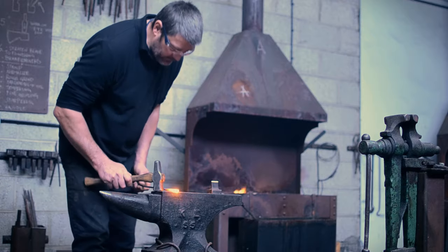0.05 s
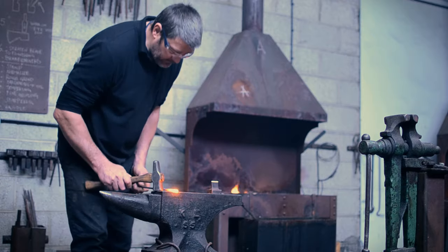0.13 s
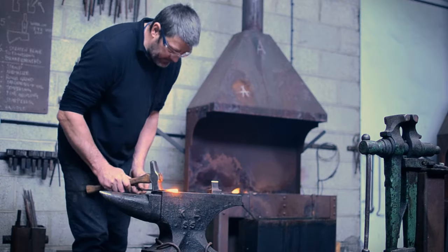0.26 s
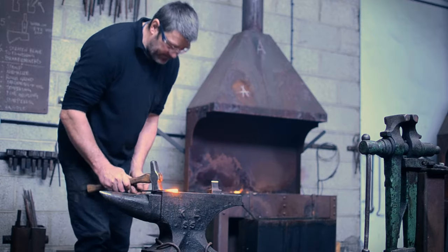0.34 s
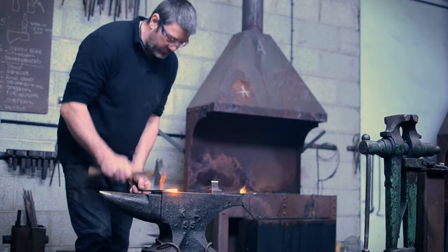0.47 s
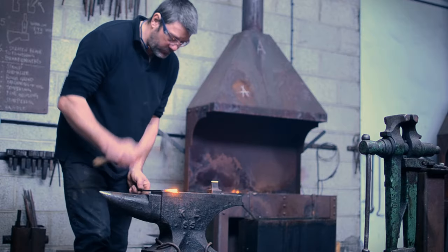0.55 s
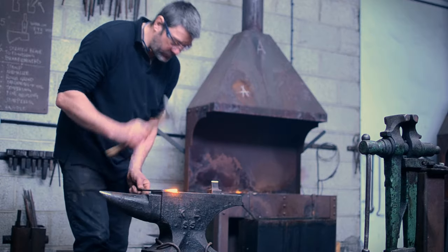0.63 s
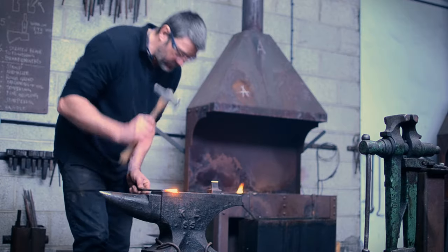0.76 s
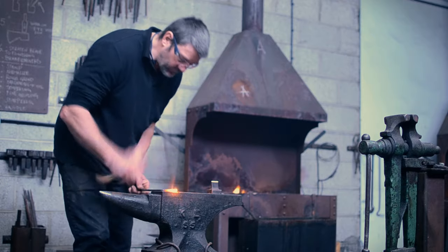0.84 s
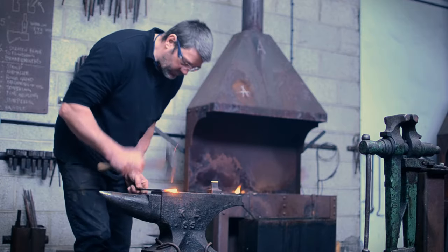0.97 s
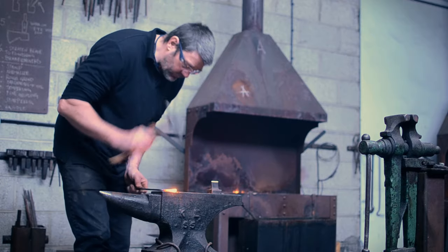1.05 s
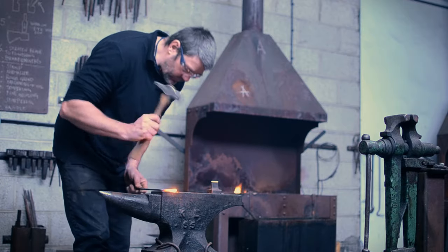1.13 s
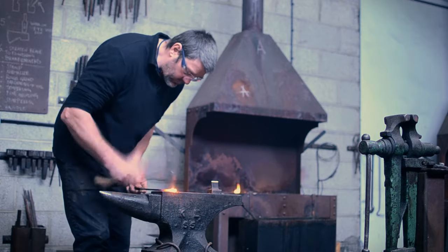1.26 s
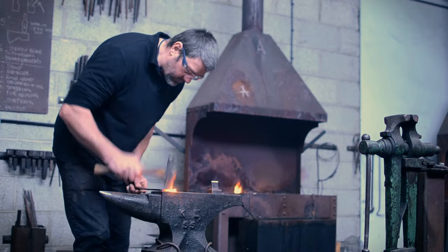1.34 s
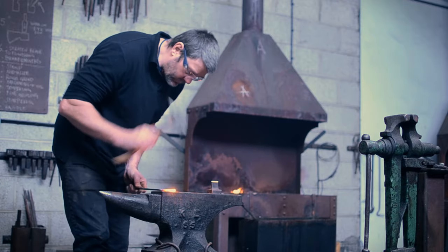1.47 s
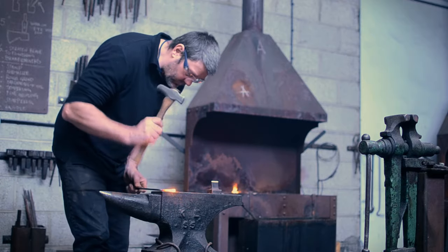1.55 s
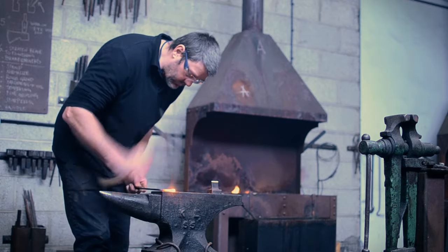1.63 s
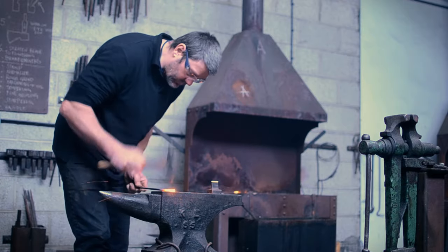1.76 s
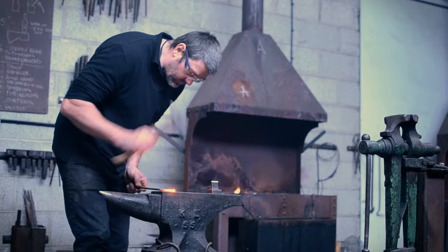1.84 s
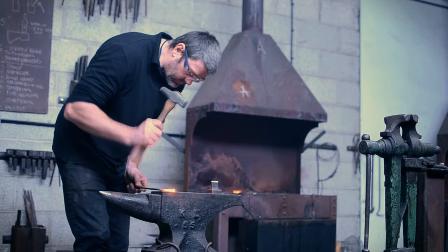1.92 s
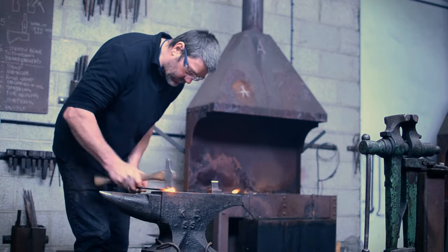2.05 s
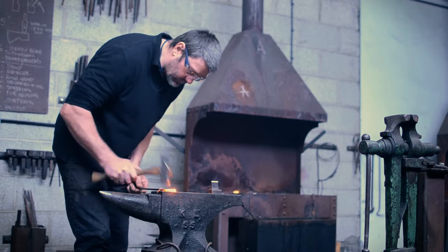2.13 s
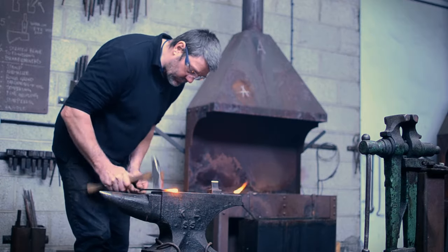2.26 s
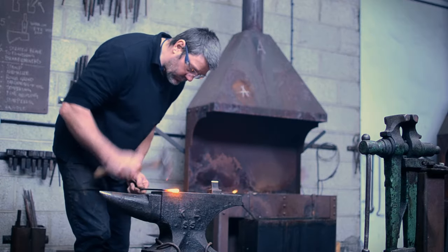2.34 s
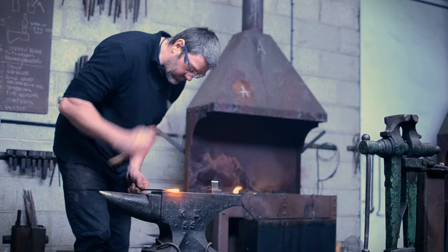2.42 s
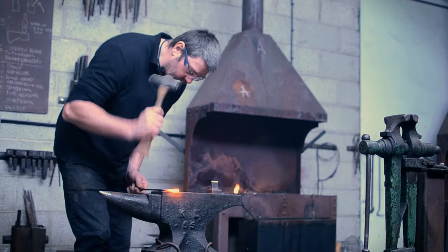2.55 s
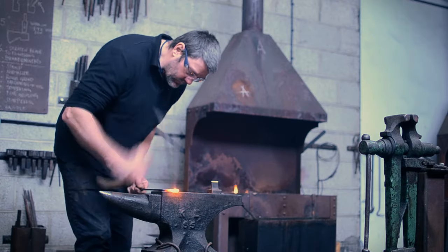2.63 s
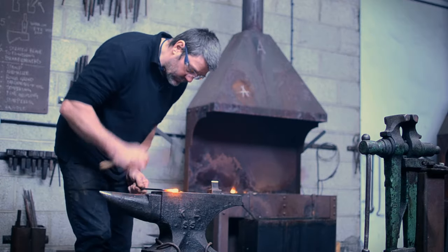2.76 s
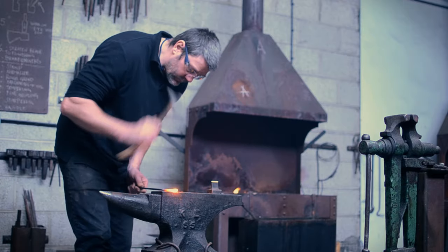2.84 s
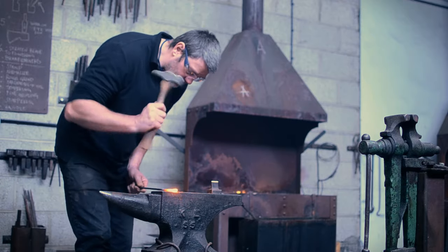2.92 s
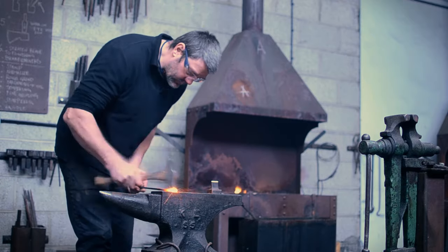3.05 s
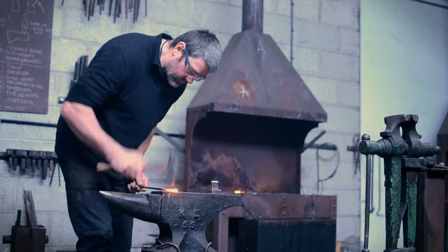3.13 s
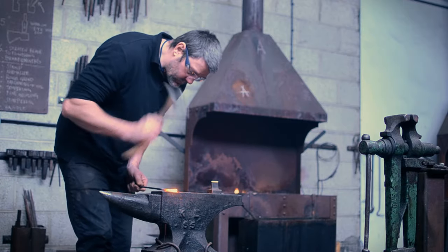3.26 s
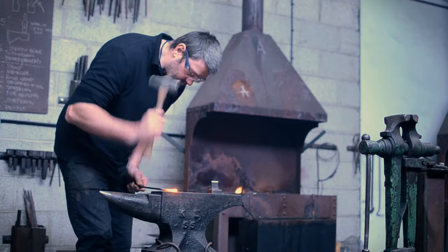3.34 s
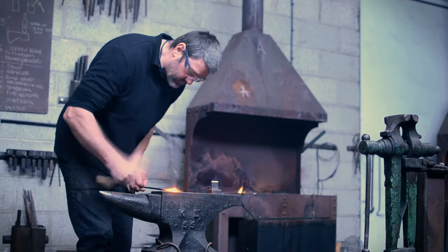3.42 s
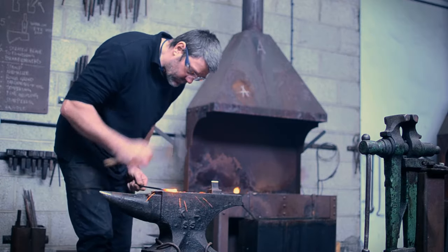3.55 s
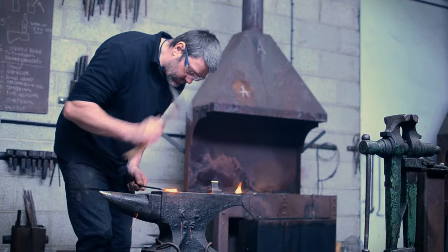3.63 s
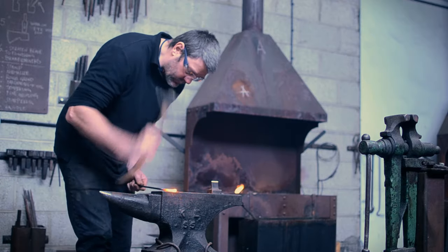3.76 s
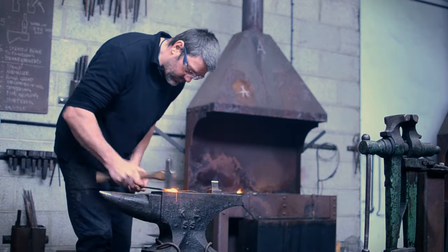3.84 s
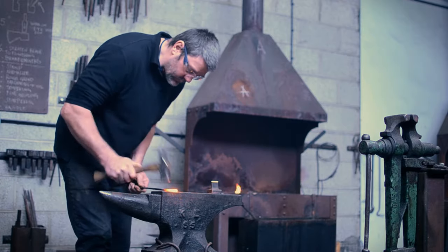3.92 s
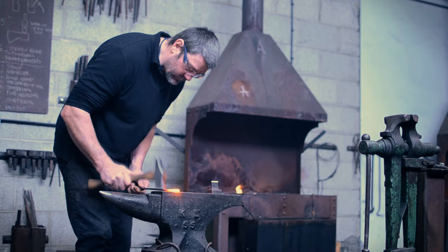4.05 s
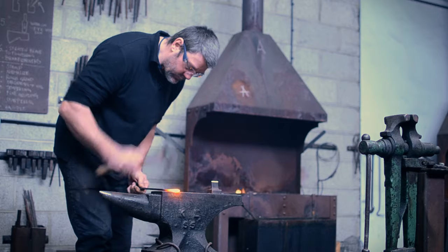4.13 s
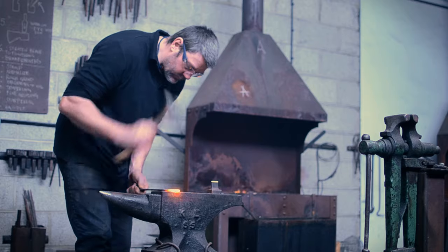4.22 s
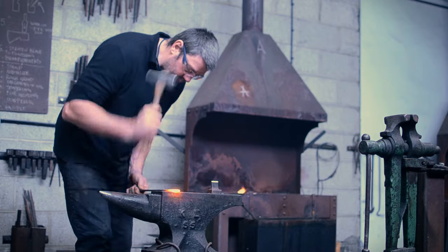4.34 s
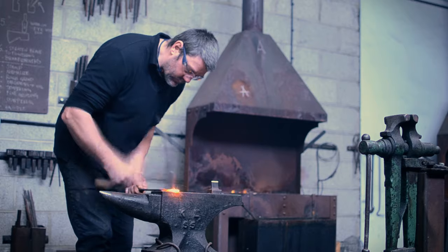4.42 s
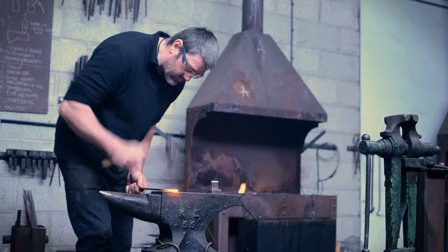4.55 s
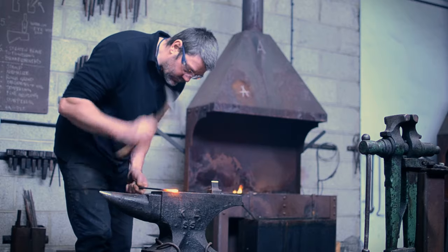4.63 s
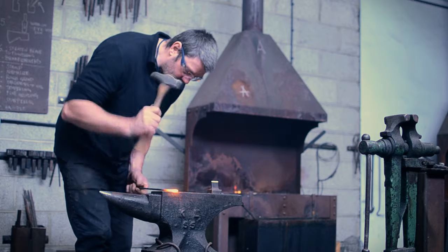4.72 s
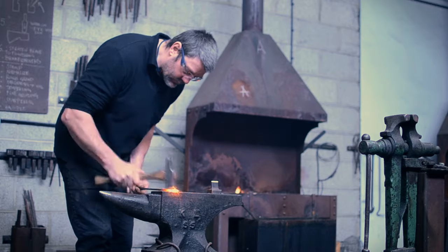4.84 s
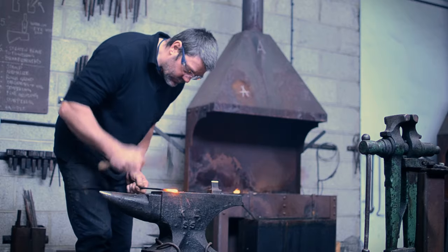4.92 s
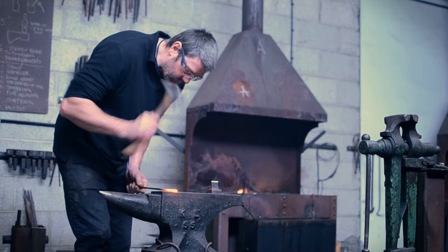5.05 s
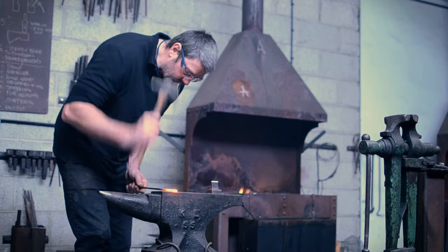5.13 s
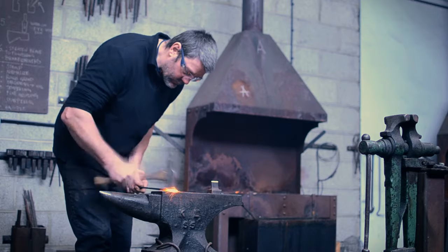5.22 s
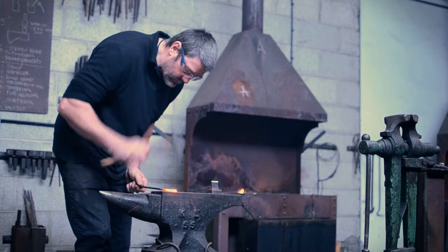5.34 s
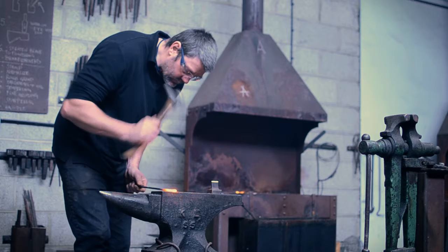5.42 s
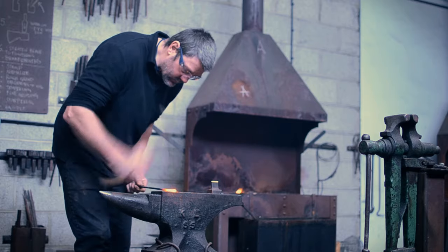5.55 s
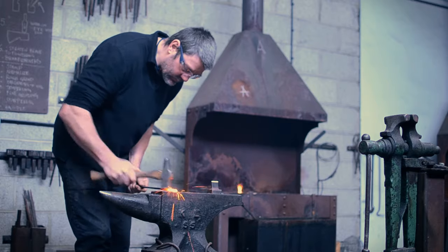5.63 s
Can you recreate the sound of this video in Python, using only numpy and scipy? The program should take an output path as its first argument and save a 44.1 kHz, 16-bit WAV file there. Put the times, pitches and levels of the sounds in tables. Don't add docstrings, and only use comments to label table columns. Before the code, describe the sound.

In a block-walled workshop, a forge blower makes a faint, steady airy hiss with a slight motor hum. A weak anvil ring lingers at the start. From 0.9 seconds a smith hammers a hot bar on the anvil: blows at about 0.9, 1.3, 1.7 and 2.05, then 2.7, 3.1, 3.45 and 3.85, then 4.45, 4.85, 5.25 and 5.6. Each is an abrupt, full, slightly cushioned crack, followed by a clear, wavering metallic ring centred near two kilohertz, fading over roughly half a second and overlapping the next. Strength and brightness vary a little. At 2.3 and 4.1 the hammer drops lightly on the bare anvil face, harder, brighter and quieter; tiny rebound clicks follow the first tap and the 3.85 blow. Near walls give immediate slaps and a diffuse tail of about one second. Close microphone, softened extreme treble, loudest peaks flattened.

```python
import sys
import numpy as np
from scipy import signal
from scipy.fft import rfft, irfft
from scipy.io import wavfile
from scipy.ndimage import uniform_filter1d, map_coordinates

SR = 44100
rng = np.random.default_rng(int(sys.argv[2]) if len(sys.argv) > 2 else 0)


def gain_from_db(level_db):
    decades = np.asarray(level_db, float) / 20
    return 10 ** decades


def digitize_waveform(pressure):
    field = np.atleast_2d(pressure).T
    bounded = np.clip(field, -1, 1)
    quanta = np.round(bounded * 32767).astype(np.int16)
    wavfile.write(sys.argv[1], SR, quanta)


N = 250488
LEAD = SR // 4

# (time [s], peak [dB], brightness [dB], nearness to the horn [dB])
HOT_BLOWS = [(0.892, -2.5, 1.5, -5.5), (1.2974, -1.5, -0.5, -1.5), (1.6886, -2, -0.5, -2.5),
             (2.063, 0, -2.5, -7.5), (2.684, 0, 0.5, -2.5), (3.078, -3, -0.5, 1), (3.465, 1, -1, -5.5),
             (3.8452, -5, 0, -0.5), (4.467, 1, 1.5, -8), (4.8629, 0.06, -1, -4), (5.249, 0, -2, -2),
             (5.6104, -2, -1.5, 0)]
# (frequency [Hz], level [dB per Hz])
BARE_CRACK = [(300, -50), (800, -10.5), (1200, 2), (1500, -8), (2500, 4.5), (3100, -7), (4200, 0),
              (5000, -13), (6200, -6.5), (6800, -17.5), (10000, -18.5), (16000, -25)]


def unit(x):
    return x / np.sqrt(np.mean(x ** 2) + 1e-20)


def along(points, hz):
    f, v = np.transpose(points)
    return np.interp(np.log(hz + 1), np.log(f + 1), v)


def wobble(rate):
    knots = rng.standard_normal(int(N * rate / SR) + 4)
    return map_coordinates(knots, [np.arange(N) * rate / SR])


def causal(gain_db):
    level_db = np.maximum(gain_db(np.fft.rfftfreq(4096, 1 / SR)), -120)
    cepstrum = irfft(level_db * np.log(10) / 20)
    cepstrum[1:2048] *= 2
    cepstrum[2049:] = 0
    return irfft(np.exp(rfft(cepstrum)))[:2048]


def add(track, s, sound):
    part = track[LEAD + round(s * SR):][:len(sound)]
    part += sound[:len(part)]


def blower():
    # (frequency [Hz], level [dB per Hz])
    air_colour = [(30, -3.5), (120, -9.5), (300, 2.5), (500, -2.5), (900, -2), (1300, -3.5), (2200, -8),
                  (3500, -12.5), (5500, -22.5), (9000, -16), (16000, -23.5)]
    # (frequency [Hz], level [dB rms])
    motor = [(145.3, -59), (193.8, -51), (430.7, -58), (522.2, -58), (866.7, -55)]
    hz, _, z = signal.stft(rng.standard_normal(N), SR, nperseg=2048)
    patches = uniform_filter1d(rng.standard_normal(z.shape), 20, 0)
    patches = unit(uniform_filter1d(patches, 3, 1))
    z = z * gain_from_db(along(air_colour, hz)[:, None] + 1.06 * patches)
    air = unit(signal.istft(z, SR, nperseg=2048)[1][:N])
    t = np.arange(N) / SR
    hum = np.zeros(N)
    for f, db in motor:
        level = gain_from_db(db + 2.5 + 1.6 * wobble(9.0))
        hum += level * np.sin(2 * np.pi * f * t + 0.74 * wobble(6.7))
    drift_db = 0.4 * wobble(3.8)
    return gain_from_db(-43.5 + drift_db) * air + hum


def shop(x):
    # (frequency [Hz], t60 [s])
    reverb = [(200, 0.49), (600, 1.365), (1500, 0.83), (4000, 0.95), (8000, 0.56), (15000, 0.46)]
    # (delay [s], level [dB])
    echoes = [(.0021, 2.5), (.0038, 3), (0.021, 0), (0.031, -44), (.069, -18)]
    flutter = 0.0645
    hz, t, z = signal.stft(rng.standard_normal(SR + SR // 2), SR, nperseg=256)
    decay = gain_from_db(-60 * t / along(reverb, hz)[:, None])
    tail = signal.istft(z * decay, SR, nperseg=256)[1]
    t = np.arange(len(tail)) / SR
    tail *= 1 - np.exp(-(t / 0.0052) ** 2)
    tail *= 1 - 0.41 * np.exp(-t / 0.06)
    tail *= 1 + 0.35 * np.exp(-(t % flutter) / 0.015)
    tail *= gain_from_db(10.5) / np.linalg.norm(tail)
    for s, db in echoes:
        tail[round(s * SR)] += gain_from_db(db)
    return signal.fftconvolve(x, tail)[:len(x)]


def knocks():
    # (time [s], peak [dB])
    rebounds = [
        (2.333, -11),
        (3.849, -9),
    ]
    track = np.zeros(N + LEAD)
    for s, db in rebounds:
        add(track, s, gain_from_db(db + 18) * causal(lambda hz: along(BARE_CRACK, hz)))
    for s, db, *_ in HOT_BLOWS:
        jolt = np.hanning(round(0.005 * SR))
        add(track, s, gain_from_db(db - 31) * jolt)
    return track


def cracks(events, colour, thud, push_db, head_db):
    # (frequency [Hz], level [dB], t60 [s])
    head_modes = [(1134, -13, 0.012), (1640, -15, 0.024), (2510, -9.5, 0.018), (2545, -13, 0.029),
                  (3984, -14, 0.013), (4325, -18.5, 0.048), (6170, -23, 0.053), (6790, -31, 0.032),
                  (9320, -22.5, 0.049), (10180, -30, 0.044), (14000, -27, .04), (14900, -31, .04)]
    track, t = np.zeros(N + LEAD), np.arange(4096) / SR
    for s, db, bright_db, horn_db in events:
        thud_db = np.dot(thud, (1, db, horn_db))
        lean = [(500, thud_db), (1500, 0.01), (3000, 0), (6000, bright_db)]
        uneven = [(hz, rng.normal(0, 0.87)) for hz in np.geomspace(200, 16000, num=24)]
        push = causal(lambda hz: along(colour, hz) + along(lean, hz) + along(uneven, hz))
        head = np.zeros(len(t))
        for hz, level, t60 in head_modes:
            mode_db = level + along(lean, hz) + rng.normal(0, 1.5)
            head += gain_from_db(mode_db - 60 * t / t60) * np.sin(2 * np.pi * hz * t)
        add(track, s, gain_from_db(db + push_db) * push)
        add(track, s, gain_from_db(db + head_db) * head)
    for lag in (5, 13):
        loop = np.r_[1, np.zeros(lag - 1), 0.65]
        track = signal.lfilter(loop[::-1], loop, track)
    return track


def ring(events, column, ring_db, grows):
    # (frequency [Hz], beat period [s], first swell [s], weaker twin [dB])
    modes = [(1099, .1, .03, -6), (1590, .1, .03, -8), (1649, -.2, .03, -8), (1906.5, -.125, .055, -2.5),
             (2016, .1, .03, -12), (2354, .085, .11, -5), (2512, .055, .03, -2), (2590, .07, .03, -4),
             (2729, .07, .04, -5), (3331.5, -.2, .225, -3.5), (3532, .2, .14, -7), (3900, .13, .12, -7),
             (4156, .09, .03, -4), (4324, -.125, .135, -3), (4765, .1, .04, -5), (6175, -.035, .03, -2),
             (6783, .1, .04, -5), (7573, .04, .06, -8), (8950, .08, .03, -5), (10170, .08, .03, -5),
             (12524, .06, .09, -6), (13640, .08, .03, -5), (15030, .08, .03, -5)]
    # (under a blow [dB], under a tap [dB], t60 [s])
    answers = [(-22, -30, 0.91), (-44, -15.5, 0.31), (-7.5, -14.5, 0.48), (2, -11, 0.63), (-2.5, -11, 0.58),
               (-14, -34, 0.61), (-29, -17.5, 0.88), (-23, -15, 0.65), (-38, -16, 0.4), (-11.5, -25, 0.91),
               (-11.5, -11.5, 0.6), (-11, -3.5, 0.59), (-33, -22, 0.41), (-42, -16.5, 0.52),
               (-49, -25, 0.58), (-50, -26, 0.4), (-51, -54, .55), (-13, -19, 0.42), (-36, -28, 0.34),
               (-29, -52, 0.41), (-18, -20, .5), (-52, -48, .3), (-69, -26, .5)]
    track, t = np.zeros(N + LEAD), np.arange(SR) / SR
    hz, beat, swell, twin_db = np.transpose(modes)[..., None]
    t60 = np.transpose(answers)[2, :, None]
    slow = (hz < 8000) | (hz > 12000)
    filling = (1 - np.exp(-t / 0.003)) * (1 - 0.8 * slow * np.exp(-t / 0.12))
    main = np.exp(2j * np.pi * hz * t) * gain_from_db(-60 * t / t60) * filling
    twin = main * gain_from_db(twin_db) * np.exp(2j * np.pi * (t - swell) / beat)
    horn = (hz[:, 0] > 3000) & (hz[:, 0] < 4000)
    high = hz[:, 0] > 5000
    for s, db, bright_db, horn_db in events:
        level, turn, share = rng.standard_normal((3, len(modes)))
        strength = np.transpose(answers)[column] + (1.3 + 1.5 * high) * level
        strength = strength + bright_db * high + horn_db * horn
        force = np.where(high, 2 - grows, grows) * db
        gain = gain_from_db(force + ring_db + strength)
        other = gain * gain_from_db(2.5 * share) * np.exp(2j * np.pi * 0.07 * turn)
        add(track, s, gain @ main.imag + (other @ twin).imag)
    return track


def bare_taps():
    # (time [s], peak [dB], brightness [dB], nearness to the horn [dB])
    taps = [
        (-.05, -19, -12, 4),
        (2.3, -6.5, -6, -5),
        (4.086, -7.5, -3.5, -5.5),
    ]
    # (level [dB], per force [dB per dB], towards the horn [dB per dB])
    thud = (-2.5, -0.67, .1)
    crack = cracks(taps, BARE_CRACK, thud, push_db=17.5, head_db=-18)
    return crack, ring(taps, column=1, ring_db=1.1, grows=1.27)


def hot_blows():
    # (frequency [Hz], level [dB per Hz])
    colour = [(100, -21), (300, -2.5), (600, -6), (1000, -0.5), (1350, -6.5), (1700, 0.5), (2400, -4.5),
              (2900, -12.5), (4200, -20.5), (5000, -19.5), (6200, -22), (9000, -19), (12000, -23.5),
              (14800, -23.5)]
    # (level [dB], per force [dB per dB], towards the horn [dB per dB])
    thud = (-5, -0.86, 0.53)
    crack = cracks(HOT_BLOWS, colour, thud, push_db=15, head_db=-19.5)
    return crack, ring(HOT_BLOWS, column=0, ring_db=-15.0, grows=1.4)


def scene():
    blow_crack, blow_ring = hot_blows()
    tap_crack, tap_ring = bare_taps()
    crack = blow_crack + tap_crack
    bell = blow_ring + tap_ring
    hammer = crack + shop(crack) + knocks() + bell + gain_from_db(-19.0) * shop(bell)
    return (hammer[LEAD:] + blower())[None]


def top_cut(x):
    return signal.sosfilt(signal.butter(12, 15760, fs=SR, output="sos"), x)


def record(dry):
    # (frequency [Hz], gain [dB])
    mic = [(20, -19), (110, -8.5), (140, 1), (220, 0.5), (7500, 4.5), (7900, -4.5), (8400, -2.5),
           (10300, -4.5), (11300, -16.5), (12600, -19), (13500, -5.5), (15800, -5), (15900, -20),
           (16900, -47)]
    ceiling = 0.73
    heard = signal.fftconvolve(dry, causal(lambda hz: along(mic, hz))[None], axes=1)[:, :N]
    held = heard / (1 + np.abs(heard / ceiling) ** 5) ** (1 / 5)
    return top_cut(held)


dry = scene()
out = record(dry)
digitize_waveform(out)
```